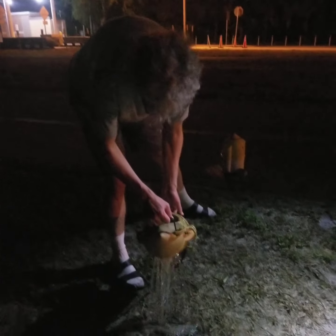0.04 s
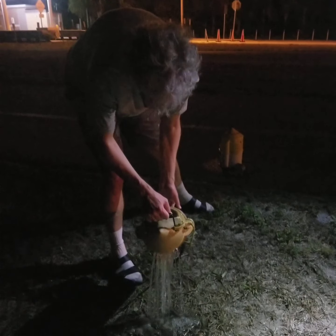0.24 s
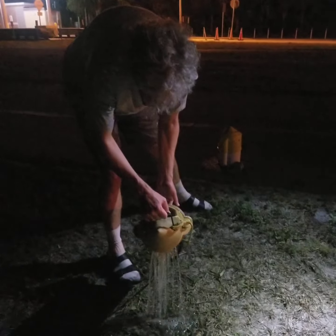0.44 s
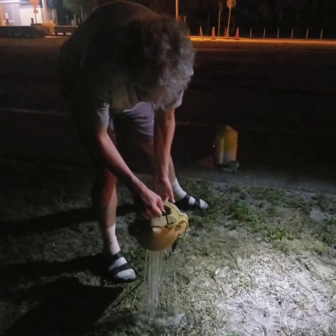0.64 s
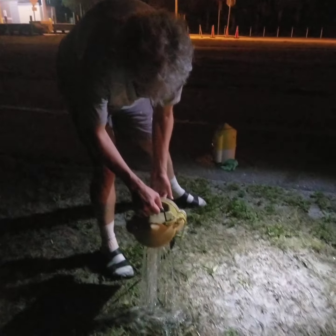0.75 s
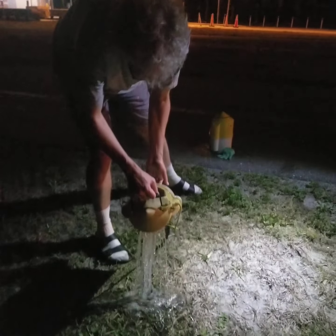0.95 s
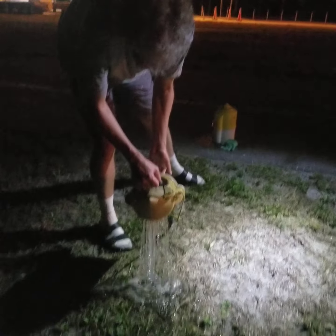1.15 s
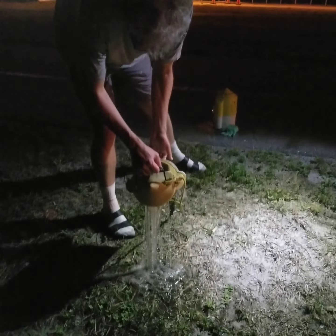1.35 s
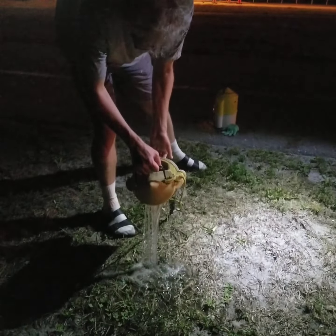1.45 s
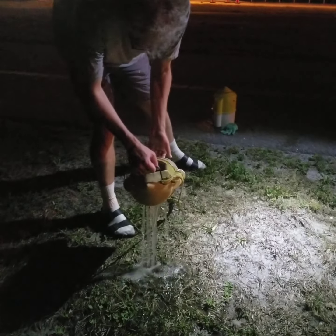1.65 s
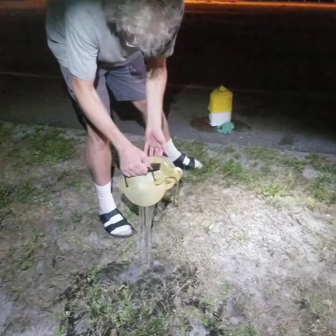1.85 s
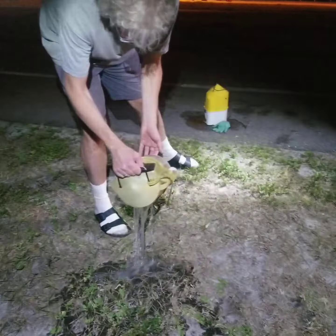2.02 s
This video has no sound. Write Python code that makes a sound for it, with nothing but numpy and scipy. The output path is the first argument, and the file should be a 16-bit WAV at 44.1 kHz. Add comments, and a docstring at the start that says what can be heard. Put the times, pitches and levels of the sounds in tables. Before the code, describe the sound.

Water pours from a bucket onto grass, close and outdoors. A smooth, dense gush swells from 0 to 0.3 s, with low wind thumps mostly on the left. From about 0.4 s a steady hissing, splattering stream drums on the turf. After 1.4 s it thins into uneven, crisp splats, with a sharp cluster near 1.96 s and scattered ones until 2.5 s. Brighter on the right.

```python
"""Grass at night: a bucket of water is poured out to the right of a handheld camera with two shadowed ports.
The first gush is smooth noise. The stream after it is hissing noise, low drumming and short noise bursts;
it thins and breaks into ever more separate splats, answered once by the ground.
Wind, low-passed noise with its own level curve on each port, buffets the two apart."""
import sys
import numpy as np
from scipy import signal
from scipy.fft import rfft, irfft, next_fast_len
from scipy.io import wavfile
from scipy.ndimage import map_coordinates

SR = 44100
rng = np.random.default_rng(int(sys.argv[2]) if len(sys.argv) > 2 else 0)


def gain_from_db(level_db):
    """Turn a decibel level (scalar or array-like) into a linear amplitude factor."""
    decades = np.asarray(level_db, float) / 20
    return 10 ** decades


def bounce(signal):
    """Save signal as a 16-bit WAV file at the path given by the first command-line argument."""
    frames = np.transpose(np.atleast_2d(signal))
    limited = np.clip(frames, -1, 1)
    pcm = np.round(limited * 32767).astype(np.int16)
    wavfile.write(sys.argv[1], SR, pcm)


N = 110250


def unit(x):
    """Scale to rms 1."""
    return x / np.sqrt(np.mean(x ** 2) + 1e-20)


def along(points, hz):
    """Interpolate (Hz, value) points on a log frequency axis."""
    point_hz, value = np.transpose(points)
    return np.interp(np.log(hz + 1), np.log(point_hz + 1), value)


def curve(rows):
    """Interpolate (s, value) rows to one value per sample."""
    return np.interp(np.arange(N) / SR, *np.transpose(rows))


def wobble(rate_hz):
    """Smooth random curve through rate_hz normal knots a second."""
    return map_coordinates(rng.standard_normal(N // 100), [np.arange(N) * rate_hz / SR])


def noise_pair():
    """Two independent white noises."""
    return rng.standard_normal((2, N))


def filtered(x, response):
    """Apply a complex response of frequency."""
    m = next_fast_len(N + 8192)
    return irfft(rfft(x, m) * response(np.fft.rfftfreq(m, 1 / SR)), m)[..., :N]


# Likeness of the two ports. Each row: frequency in Hz, correlation 0 to 1.
PORT_LIKENESS = [(300, 1), (1000, 1), (3000, 0.52), (12000, 0.26)]


def ports(pair, left, right, lead_s):
    """Mix a pair to the likeness of the ports, colour each port, advance the left; water has no bass."""
    bottom_hz = 190

    def mid_side(hz):
        angle = np.arccos(np.clip(along(PORT_LIKENESS, hz), 0, 1)) / 2
        return np.array([np.cos(angle), np.sin(angle)])

    def colour(hz):
        lead = lead_s * (hz + 500) / (hz + 3000)  # nears lead_s in the treble, a sixth of it in the bass
        left_port = gain_from_db(along(left, hz)) * np.exp(2j * np.pi * hz * lead)
        right_port = gain_from_db(along(right, hz)) + 0j
        return np.array([left_port, right_port]) / (1 + (bottom_hz / (hz + 1)) ** 4)

    mid, side = filtered(pair, mid_side)
    return filtered(np.array([mid + side, mid - side]), colour)


def place(rows, s):
    """Sum rows of samples (2, events, length) at times s."""
    at = (np.round(s * SR).astype(int)[:, None] + np.arange(rows.shape[2])).ravel()
    return np.array([np.bincount(at, r.ravel(), N + 2048)[:N] for r in rows])


def splats(s, db, hz, life_s, width):
    """Short noise bursts: broad band about hz over a treble floor, quick rise, short death, longer if low."""
    rise_s = 0.00042
    t, f = np.arange(1024) / SR, np.fft.rfftfreq(1024, 1 / SR)
    centre = hz[:, None]
    band = np.exp(-.5 * ((f - centre) / (width * centre)) ** 2) + 0.27 * f / (f + 2500)
    white = rng.standard_normal((2, len(s), 1024))
    noise = irfft(rfft(white) * band)
    age = t / (life_s * (1 + 900 / hz))[:, None]
    shape = (1 - np.exp(-t / rise_s)) * np.exp(-age * age)
    # each burst gets its expected energy, whatever its noise draw
    expected = np.mean(band ** 2, 1) * np.mean(shape ** 2, 1)
    size = np.sqrt(expected / np.mean((noise * shape) ** 2, (0, 2)))
    return place(noise * shape * (gain_from_db(db) * size)[:, None], s)


DRUM_TOP_HZ = 1050  # the drum lies below, the sheet above


def sheet(flow_db, lumps_db):
    """Hissing sheet of water: high-passed noise whose level exaggerates the flow."""
    hiss = filtered(noise_pair(), lambda hz: hz / (hz + DRUM_TOP_HZ))
    return hiss * gain_from_db(-0.5 + 1.69 * flow_db + lumps_db)


def drum(flow_db, t):
    """Drumming on the turf: lumpy low-passed noise following the flow, then fading."""
    fade_start_s, fade_db_per_s = 1.274, 17
    low = filtered(noise_pair(), lambda hz: 1 / (1 + (hz / DRUM_TOP_HZ) ** 4))
    fade_db = fade_db_per_s * np.clip(t - fade_start_s, 0, None)
    return unit(low) * gain_from_db(-14.5 + flow_db - fade_db + 2.2 * wobble(55.01))


def small_splats(flow_db, lumps_db, count):
    """Random splats, more unequal as the stream breaks up, with the flow setting their level."""
    u = rng.random((count, 4))
    s = u[:, 0] * N / SR
    spread_db = 2 + 0.55 * s  # half the range of levels
    hz = 2600 + 13000 * u[:, 2]
    life_s = 0.0008 * 4 ** (u[:, 3] - .5)
    small = splats(s, spread_db * 2 * u[:, 1], hz, life_s, width=0.23)
    return unit(small) * gain_from_db(flow_db - 3 + 1.07 * lumps_db)


# Splats that stand out. Each row: start in seconds, gain in dB before the stream gain and port colours,
# centre in Hz, life in seconds before low splats are stretched.
LOUD_SPLATS = [(1.474, 13, 630, 0.0027), (1.65, 3, 690, 0.0055), (1.735, 8, 690, .008),
               (1.5054, 12.5, 9600, 0.0044), (1.558, 12, 3600, 0.0027), (1.583, 14, 9000, 0.0026),
               (1.626, 15, 10500, 0.0028), (1.6801, 18, 8400, 0.0013), (1.7332, 6, 9600, 0.0035),
               (1.9597, 20, 1830, 0.0014), (1.9598, 25.5, 6100, 0.0017), (1.9702, 17.5, 12500, .002),
               (1.9744, 13, 4800, 0.0028), (1.985, 15, 5100, .002), (1.9957, 9.5, 4730, 0.0091),
               (2.0026, 13, 9100, 0.0026), (2.13, 4, 690, 0.0051), (2.245, 12.5, 7760, 0.0031),
               (2.3398, 5, 7000, 0.007), (2.3588, 17, 11600, 0.0017), (2.3683, 14.5, 5470, 0.0018),
               (2.3728, 15.5, 8050, 0.0026), (2.3965, 11.5, 4760, 0.0044), (2.423, 12.5, 8200, 0.0047),
               (2.4705, 6.5, 9800, 0.0058)]


def loud_splats():
    """The loudest splats, one burst a row."""
    return splats(*np.transpose(LOUD_SPLATS), width=0.28)


def ground_echo(water):
    """One dull, phase-turned echo off the ground."""
    delay_s, share, top_hz, turn_rad = .002, .62, 3000, 2.7

    def response(hz):
        return 1 + share * np.exp(1j * turn_rad - 2j * np.pi * hz * delay_s) / (1 + (hz / top_hz) ** 2)

    return filtered(water, response)


def holder_echo(pair):
    """Echo off the holder's body into the left port."""
    delay_s, share = .00072, .4
    return filtered(pair, lambda hz: np.array([1 + share * np.exp(-2j * np.pi * hz * delay_s), 1 + 0j * hz]))


# Colour of the stream at the left port, and at the right port after and before the turn.
# Each row: frequency in Hz, gain in dB; the right port's frequencies after the turn are scaled as it goes on.
STREAM_LEFT_COLOUR = [(500, -25.5), (1000, -27.5), (2500, -27), (4200, -27.5), (7600, -34), (11000, -26.5),
                      (15600, -32)]
STREAM_RIGHT_COLOUR = [ (300, -18.5), (700, -18.5), (1500, -20), (2300, -16.5), (2800, -19.5),
                       (3800, -20.5), (4400, -12), (5000, -19), (6400, -24.5), (7500, -30.5), (9800, -24),
                       (11400, -20.5), (13000, -24), (14800, -29)]
STREAM_RIGHT_COLOUR_BEFORE = [(700, -19.5), (2400, -19), (3400, -16.5), (5100, -18), (7500, -29.5),
                              (8600, -26.5), (11000, -21.5), (13000, -24.5), (14600, -33)]


def turning_camera(water, t):
    """The camera turns: crossfade to a new right colour and left lead, then slide that colour up."""
    turn_s, turn_length_s = 0.95, 0.12
    before = ports(water, STREAM_LEFT_COLOUR, STREAM_RIGHT_COLOUR_BEFORE, lead_s=0.00014)
    slid = 4 * np.sqrt(np.clip((t - turn_s) / (t[-1] - turn_s), 0, 1))
    after = 0
    for i, factor in enumerate(np.linspace(0.92, 1.095, 5)):
        right = np.multiply(STREAM_RIGHT_COLOUR, [factor, 1])
        share = np.clip(1 - abs(slid - i), 0, 1)
        after = after + share * ports(water, STREAM_LEFT_COLOUR, right, lead_s=0.000301)
    turned = np.clip((t - turn_s) / turn_length_s + .5, 0, 1)
    return (1 - turned) * before + turned * after


# Flow of the stream. Each row: time in seconds, flow in dB.
STREAM_FLOW = [(.38, 3.5), (.45, 1.5), (.9, 3), (1.15, 2.5), (1.4, 2), (1.6, -1.5), (1.76, -2), (1.9, -0.5),
               (2.12, -1), (2.5, -3.5)]


def stream(count):
    """Flow drives sheet, drum and small splats; loud splats join, then ground, camera and holder."""
    gain_db, lumps_grow_per_s = -21.5, 0.68
    t = np.arange(N) / SR
    flow_db = curve(STREAM_FLOW)
    lumps_db = (0.31 * wobble(42.06) + 0.79 * wobble(90)) * (1 + lumps_grow_per_s * t)
    water = sheet(flow_db, lumps_db) + drum(flow_db, t)
    water = water + small_splats(flow_db, lumps_db, count) + loud_splats()
    return gain_from_db(gain_db) * holder_echo(turning_camera(ground_echo(water), t))


# The first gush. Each row: time in seconds, level in dB.
GUSH_LEVEL = [(0, -34.5), (.08, -30.5), (.17, -28), (.3, -30.5), (.34, -37), (.38, -46.5), (.46, -86)]
# Its colour at each port. Each row: frequency in Hz, relative gain in dB.
GUSH_LEFT_COLOUR = [(300, -9.5), (1100, -24.5), (4500, -22), (5450, -44), (6300, -19), (6950, -41),
                    (7400, -22.5), (11400, -20), (15600, -15)]
GUSH_RIGHT_COLOUR = [ (450, -6.5), (850, -16.5), (2900, -6.5), (3450, -13), (4500, 4), (5500, -6),
                     (6600, -13.5), (8800, -19.5), (10500, -11), (11700, -8.5), (14000, -16.5),
                     (15200, -19)]


def gush():
    """Dense, smooth rush: coloured noise with a slight flutter."""
    noise = noise_pair() * gain_from_db(0.73 * wobble(66.0))
    rush = ports(noise, GUSH_LEFT_COLOUR, GUSH_RIGHT_COLOUR, lead_s=0.000305)
    return gain_from_db(curve(GUSH_LEVEL)) * unit(rush)


# Wind on each port. Each row: time in seconds, gain in dB.
WIND_LEFT_GAIN = [(0, -55), (.08, -31), (.15, -38.5), (.28, -26), (.45, -57.5), (.62, -42), (.76, -49.5),
                  (.87, -37.5), (.96, -51), (1.03, -34.5), (1.16, -54), (1.75, -45.5), (1.88, -56),
                  (2.5, -60.5)]
WIND_RIGHT_GAIN = [ (0, -46), (.5, -53), (1, -54), (1.3, -39), (1.6, -52), (1.88, -59), (2.5, -60)]
# Wind spectrum. Each row: frequency in Hz, relative gain in dB.
WIND_COLOUR = [(15, -10), (75, -6.5), (200, -25), (1000, -105)]


def wind():
    """Lumpy low buffeting: noise and levels independent between the ports."""
    noise = filtered(noise_pair(), lambda hz: gain_from_db(along(WIND_COLOUR, hz)))
    gain_db = np.array([curve(rows) + 0.25 * wobble(9.6) for rows in (WIND_LEFT_GAIN, WIND_RIGHT_GAIN)])
    return unit(noise) * gain_from_db(gain_db)


def scene():
    """Sum of stream, gush and wind."""
    return stream(count=2200) + gush() + wind()


def roll_off(x):
    """The treble ends steeply here."""
    return signal.sosfilt(signal.butter(12, 16640, fs=SR, output="sos"), x)


def record(dry):
    """Band limit: gentle low cut at 40 Hz, sharp top at 15950 Hz."""
    mix = filtered(dry, lambda hz: (hz < 15950) * hz / (hz + 40))
    return roll_off(mix)


dry = scene()
out = record(dry)
bounce(out)
```